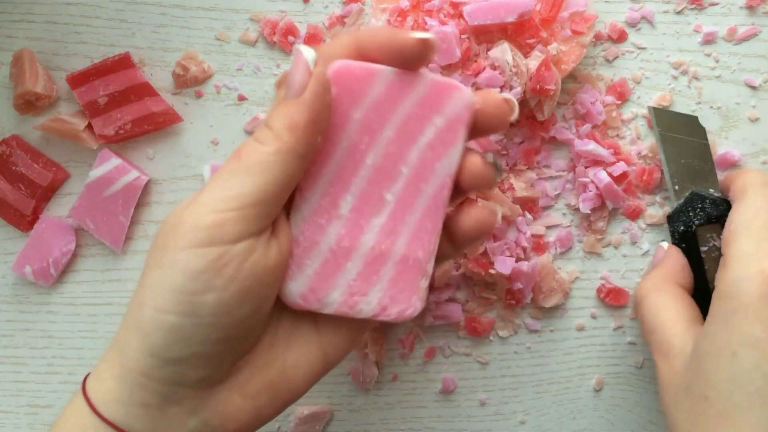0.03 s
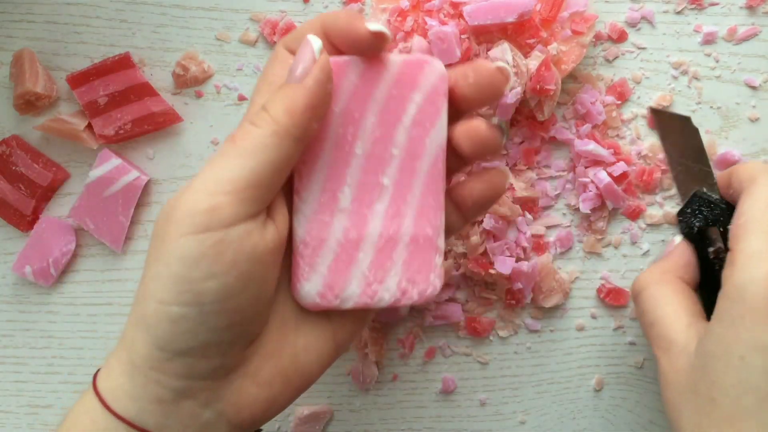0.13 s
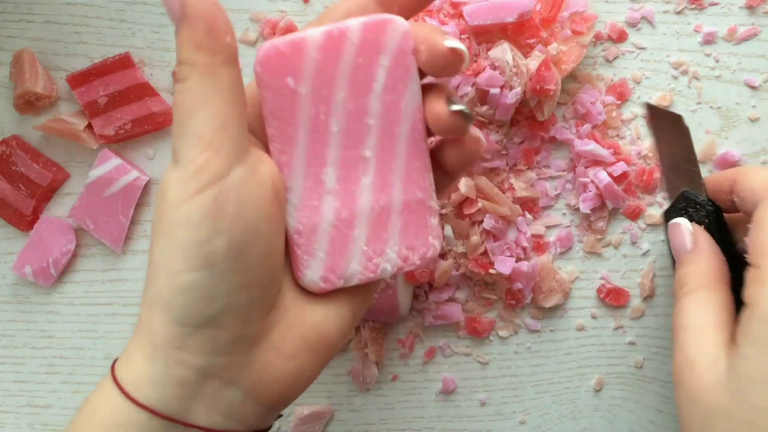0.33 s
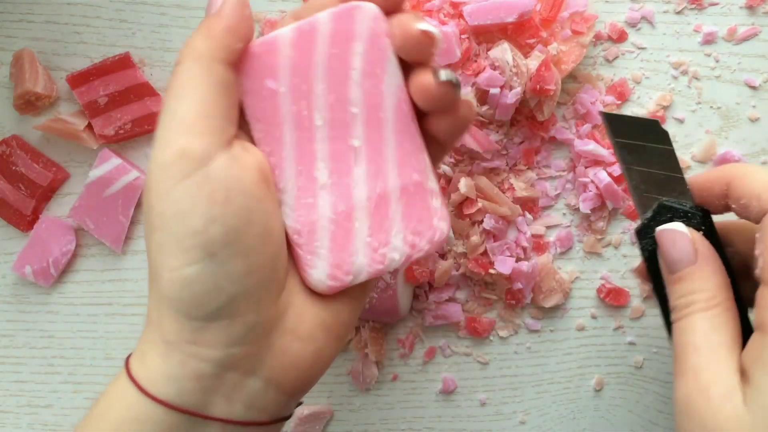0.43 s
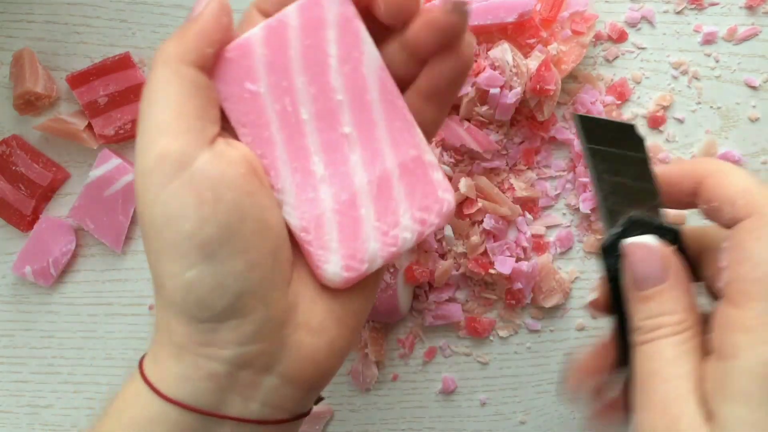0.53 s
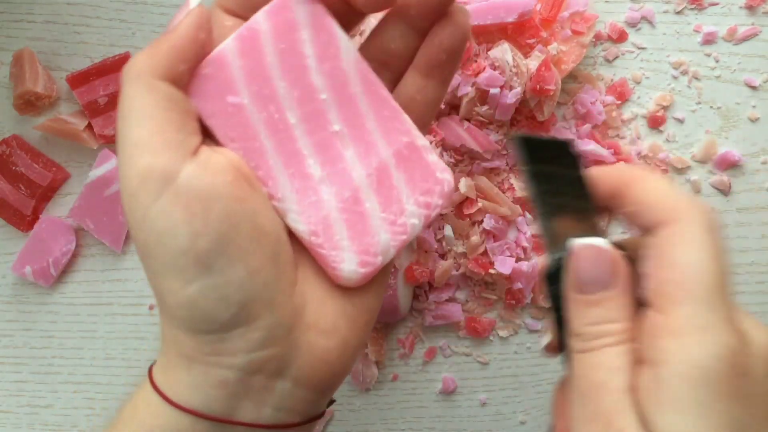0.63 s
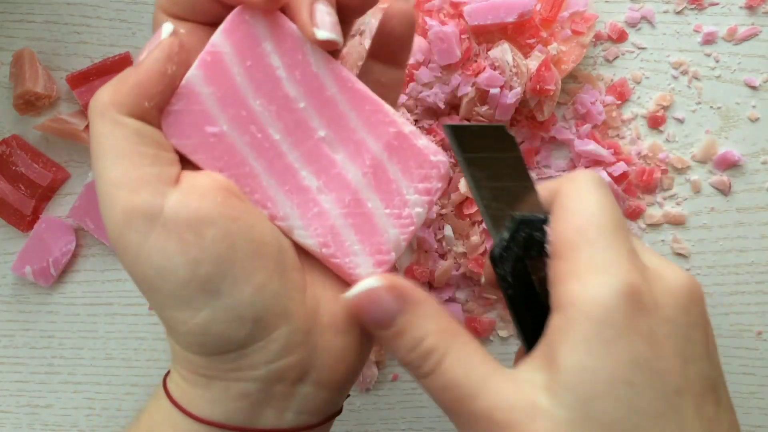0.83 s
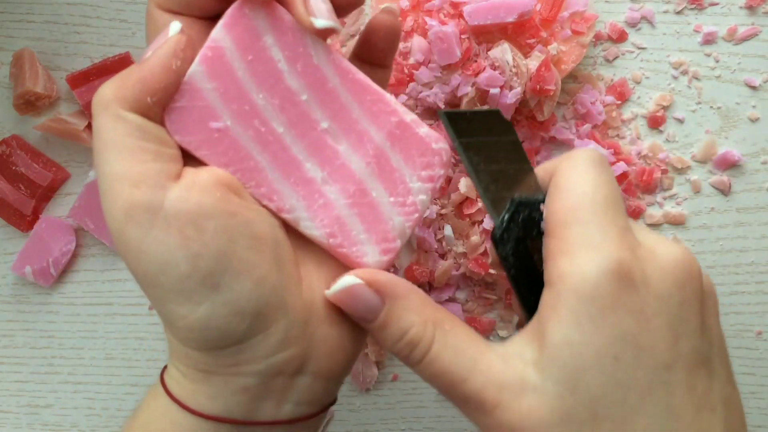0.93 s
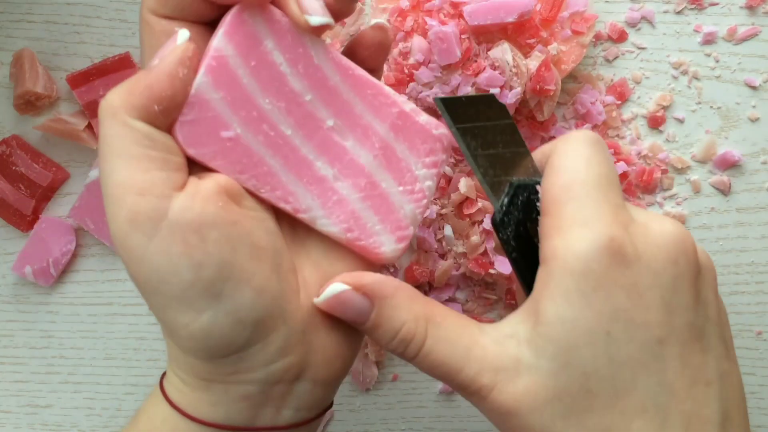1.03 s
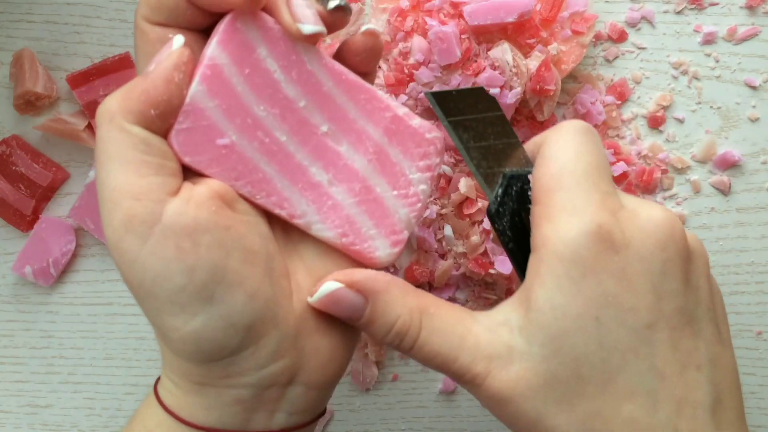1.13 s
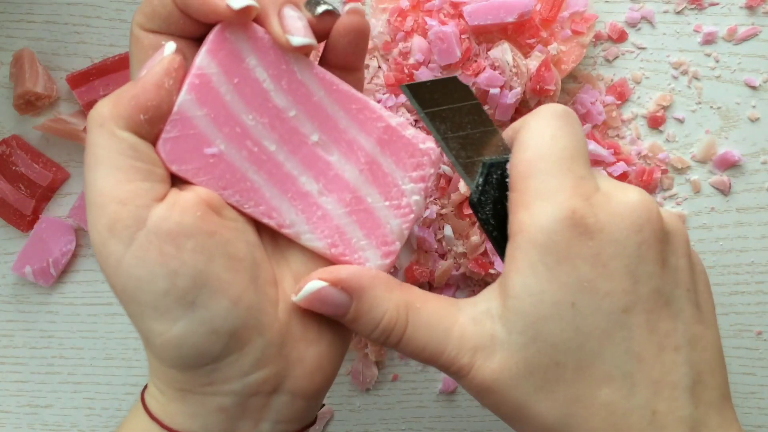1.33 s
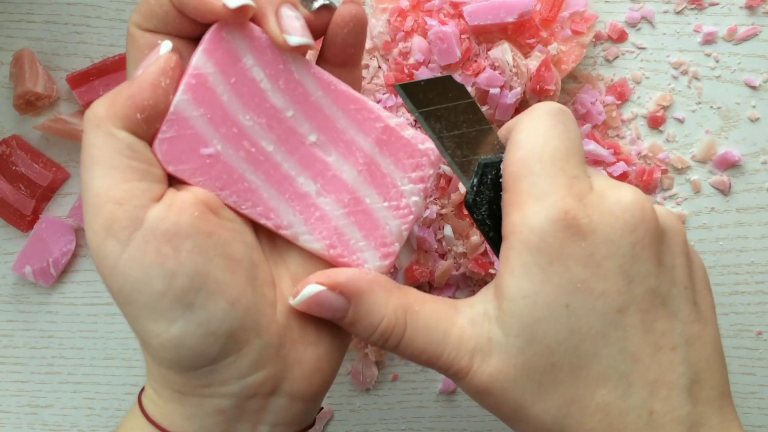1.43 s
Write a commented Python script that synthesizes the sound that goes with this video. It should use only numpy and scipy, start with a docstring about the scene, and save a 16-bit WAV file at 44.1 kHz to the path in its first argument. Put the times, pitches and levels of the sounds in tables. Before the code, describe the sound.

A utility knife knocks once, hard, on a wooden table, crunching soap crumbs, and drags off with a short rasp. Small blade and fingernail ticks and soft hand bumps on a soap bar follow, close by in a quiet room.

```python
"""A snap-off knife is turned over and picked up, close by, from a wooden table strewn with soap crumbs.
Its handle knocks, once hard: the wood thuds, the knife rings and crumbs crunch. It drags off in a rasp
of tiny catches on the grain; then come small ticks of blade and fingernails. Skin rubs on table and
soap, a fingertip squeaks faintly and the hand bumps softly round the bar. The quiet room rumbles."""
import sys
import numpy as np
from scipy import signal
from scipy.fft import rfft, irfft
from scipy.io import wavfile

SR = 44100
rng = np.random.default_rng(int(sys.argv[2]) if len(sys.argv) > 2 else 0)


def put_to_file(sound):
    """Save the sound as 16-bit audio at rate SR, in the file named by the first command-line argument."""
    columns = np.atleast_2d(sound).T  # one column per channel
    safe = np.clip(columns, -1, 1)
    whole_steps = np.round(safe * 32767)
    wavfile.write(sys.argv[1], SR, whole_steps.astype(np.int16))


N = 66150
TIME = np.arange(N) / SR
BIN_HZ = np.maximum(np.arange(N // 2 + 1) * SR / N, 1)

# ring of handle and blade: (frequency [Hz], level [dB], t60 [s])
KNIFE_MODES = [(1465, -9, .07), (2548, -6.5, .05), (3390, -5, .055), (3665, -9, .04), (4260, -7, .04),
               (4790, -8, .03), (5390, -2, .035), (6060, -3, .026), (6840, -13, .03), (7990, -6, .02),
               (8765, -2, .02), (9220, -10, .025), (10180, -3, .022), (11600, -8, .022)]


def handle_knocks():
    """Each knock pushes the table top down, crushes a few crumbs and sets the knife ringing."""
    # handle hits: (time [s], table thud [dB], knife ring [dB], crunch [dB])
    hits = [(0.0741, -50, -61, -63), (0.1342, -50, -71, -70.5), (0.1889, -59.5, -52, -46.5),
            (0.2212, -47.5, -43, -28.5), (0.2250, -25, -26, -23.5), (0.2563, -53, -54, -36.5),
            (0.2706, -43.5, -64, -60), (0.3215, -62, -52, -47), (0.4308, -83, -61.5, -56)]
    # tone of the crushed crumbs: (frequency [Hz], level [dB])
    crunch_tone = [(420, -12), (700, -2), (1200, 2), (2100, -5), (3300, 1), (5400, -4.5), (7000, -10.5),
                   (9000, -11), (11500, -14), (13000, -23), (15500, -33)]
    # brief stereo widening of the noise at the knocks: (frequency [Hz], side minus mid [dB])
    widening = [(300, -6), (2500, -22.5), (5000, -7), (9000, 2.5), (13000, 1.5)]
    crush_attack_s, crush_t60_s = .002, .025
    times, table_db, knife_db, crunch_db = np.transpose(hits)
    crush = sum(from_db(db) * burst(t, crush_attack_s, crush_t60_s) for t, db in zip(times, crunch_db))
    # the knife's modes start one by one as the crumbs give way
    knife = sum(ring(clicks(times + crush_attack_s * rng.random(), knife_db), [m]) for m in KNIFE_MODES)
    knife = rolloff(knife, hz=12500, order=6)
    noise = stereo(colour(crunch_tone), width=widening)
    return knife - table_top(clicks(times, table_db)) + crush * noise


def handle_drag():
    """The handle catches on the wood grain in a dense rasp, heard directly and through table and knife."""
    # envelope of the drag: (time [s], level [dB])
    envelope = [(0, -56), (0.04, -59.5), (0.062, -73.5), (0.11, -56.5), (0.124, -69.5), (0.176, -60.5),
                (0.192, -52.5), (0.22, -36.5), (0.25, -43.5), (0.285, -44), (0.326, -38), (0.355, -47.5),
                (0.385, -48), (0.415, -64.5), (0.44, -59.5), (0.47, -72.5), (0.56, -75)]
    # tone of the direct rasp: (frequency [Hz], level [dB])
    rasp_tone = [(170, -26), (330, -7), (410, -15), (490, -6), (720, -6.5), (1000, -13), (1250, -11.5),
                 (1500, -10.5), (2020, -16.5), (2350, -14), (2560, -10), (2850, -18.5), (3900, -21),
                 (4300, -15), (4700, -22), (6200, -22.5), (7200, -26), (11500, -28), (15000, -42)]
    grains_per_s, spread_db = 5500, 2.5
    rasp_db, wood_db, knife_db = -4, -18.5, -16.5
    caught = rng.random(N) < grains_per_s / SR
    sizes = from_db(spread_db * np.minimum(rng.exponential(1, N), 4))
    grains = caught * sizes * rng.choice([-1, 1], (2, N))
    wood = from_db(wood_db) * rms_one(table_top(grains[0]))
    knife = from_db(knife_db) * rms_one(ring(grains[1], KNIFE_MODES))
    rasp = from_db(rasp_db) * stereo(colour(rasp_tone), grains)
    return level(envelope) * (rasp + wood + knife)


def table_top(force):
    """The wood answers with a hollow thud from its low modes and a lighter clack from the higher ones."""
    # resonances of the table top: (frequency [Hz], level [dB], t60 [s])
    modes = [(198, -8, .1), (220, -6, .09), (243, -7, .14), (277, -9, .1), (323, 0, .2), (342, 0, .17),
             (490, -26, .25), (574, -22, .24), (722, -22, .22), (763, -17, .25), (885, -18, .12),
             (1008, -18, .16), (1140, -18, .16), (1243, -12, .09)]
    split_hz = 400
    push_hz, contact_hz = 350, 2180   # reach of the hand's slow push and the handle's quick contact
    thud = rolloff(ring(force, [m for m in modes if m[0] < split_hz]), push_hz, order=7)
    clack = rolloff(ring(force, [m for m in modes if m[0] >= split_hz]), contact_hz, order=2)
    return rolloff(thud + clack, hz=185, order=3, kind="highpass")


def ticks():
    """Blade and fingernails make short damped contacts, each round its own pitch over a dull skirt."""
    # contacts: (time [s], level [dB], centre [Hz], width [octaves], t60 [s])
    contacts = [(0.0736, -47, 4500, 1.1, .01), (0.131, -59, 9500, .4, 0.026),
                (0.4143, -58.5, 14000, 0.74, 0.034), (0.5751, -58, 2400, 0.55, 0.022),
                (0.7950, -39.5, 5940, .5, 0.0092), (0.7971, -46, 2200, .9, 0.01),
                (0.8703, -56, 9500, .6, .01), (1.317, -70.5, 2580, 0.85, 0.016),
                (1.4925, -65.5, 3660, 0.35, 0.011)]
    skirt_db, skirt_hz = -10.5, 2500
    skirt = from_db(skirt_db) / np.hypot(1, BIN_HZ / skirt_hz)
    out = 0
    for start, db, hz, octaves, t60 in contacts:
        hump = np.exp(-.5 * (np.log2(BIN_HZ / hz) / octaves) ** 2)
        out = out + from_db(db) * burst(start, attack=.0004, t60=t60) * stereo(hump + skirt)
    return out


def low_thuds():
    """Rounded pushes wake low modes: the table thuds under the handle's knock, later the hand bumps."""
    # two rows of low table thud under the knock, then soft hand bumps: (time [s], level [dB])
    thuds = [(0.236, -46.5), (0.306, -50.5), (0.385, -57), (0.480, -68), (0.577, -58.5), (0.6585, -44),
             (0.6726, -41.5), (0.762, -53.5), (0.830, -57), (0.903, -56), (1.192, -66), (1.455, -63.5)]
    # low body of each thud: (frequency [Hz], level [dB], t60 [s])
    modes = [(52, -13, .12), (108, -3.5, .09), (168, 2, 0.062)]
    push = rolloff(clicks(*np.transpose(thuds)), hz=190, order=4)
    return -ring(push, modes)


def hand_rub():
    """Skin rubs on the table in dull swells of friction noise."""
    # envelope of the rub: (time [s], level [dB])
    envelope = [(0, -55), (0.04, -55.5), (0.06, -67.5), (0.085, -56), (0.12, -69), (0.15, -61), (0.2, -54),
                (0.38, -55.5), (0.47, -73.5), (0.58, -84), (0.67, -69), (0.75, -84.5), (1.1, -93),
                (1.145, -73.5), (1.2, -89)]
    # tone of skin on wood: (frequency [Hz], level [dB])
    tone = [(100, -23), (220, -10.5), (310, 3), (390, -5.5), (470, 0.5), (700, -8.5), (1400, -19.5),
            (3000, -38)]
    return level(envelope) * stereo(colour(tone))


def finger_slide():
    """Fingers slide on the soap with a light, bright hiss."""
    # envelope of the slide: (time [s], level [dB])
    envelope = [(0.68, -79), (0.715, -74.5), (0.738, -65), (0.765, -74), (0.81, -67.5), (0.85, -84)]
    # tone of skin on soap: (frequency [Hz], level [dB])
    tone = [(800, -11), (2500, -5.5), (3900, 1.5), (5000, -4), (11000, -6), (15000, -18)]
    return level(envelope) * stereo(colour(tone))


def fingertip_squeak():
    """Skin sticks and slips on the soap: a narrow noise band with a loose pitch."""
    pitch_hz, half_width_hz = 679, 24
    band = 1 / (1 + ((BIN_HZ - pitch_hz) / half_width_hz) ** 2)
    return from_db(-68) * burst(start=.62, attack=.048, t60=.12) * stereo(band)


def room_tail(x):
    """The room's reflections blur into a short diffuse tail."""
    # tone of the reverb: (frequency [Hz], level [dB])
    tone = [(100, -8), (300, 11.5), (1500, 6.5), (6000, -1), (15000, -2)]
    wet_db = -16.5
    tail = stereo(colour(tone)) * burst(start=.004, attack=.004, t60=.21)
    return from_db(wet_db) * signal.fftconvolve(x, rms_one(tail) / np.sqrt(N), axes=1)[:, :N]


def room_tone():
    """A low rumble swells gently under a faint steady hiss."""
    # swell of the rumble: (time [s], level [dB])
    swell = [(0, -70.5), (0.45, -68.5), (0.65, -63.5), (1.5, -63)]
    # tone of the rumble: (frequency [Hz], level [dB])
    rumble_tone = [(20, -29), (45, -14), (72, -12), (101, 0.5), (125, -5.5), (160, -9.5), (220, -25),
                   (400, -28), (900, -41), (2000, -45.5)]
    # tone of the hiss: (frequency [Hz], level [dB])
    hiss_tone = [(400, -3), (600, -1), (1000, -4), (2000, -8), (4000, -11), (6300, -7.5), (10000, -8),
                 (13000, -11.5), (15500, -19)]
    return level(swell) * stereo(colour(rumble_tone)) + from_db(-78) * stereo(colour(hiss_tone))


def from_db(db):
    """Decibels to gain."""
    return 10 ** (np.asarray(db) / 20)


def rms_one(x):
    """Scale to rms 1."""
    return x / np.sqrt(np.mean(x ** 2) + 1e-20)


def level(points):
    """Gain envelope through (time [s], level [dB]) points."""
    return from_db(np.interp(TIME, *np.transpose(points)))


def burst(start, attack, t60):
    """Envelope with a straight rise and an exponential decay; times in seconds."""
    age = TIME - start
    return np.clip(age / attack, 0, 1) * np.exp(-np.log(1000) * np.maximum(age - attack, 0) / t60)


def per_bin(points):
    """Read (frequency [Hz], value) points on a log-frequency axis."""
    hz, value = np.transpose(points)
    return np.interp(np.log(BIN_HZ), np.log(hz), value)


def colour(points):
    """EQ curve as gain per frequency, falling 12 dB an octave beyond its end points."""
    low_cut = np.minimum(BIN_HZ / points[0][0], 1) ** 2
    high_cut = np.minimum(points[-1][0] / BIN_HZ, 1) ** 2
    return from_db(per_bin(points)) * low_cut * high_cut


def rolloff(x, hz, order, kind="lowpass"):
    """A smooth cut of 6 dB an octave per order."""
    return signal.sosfilt(signal.butter(order, hz, kind, fs=SR, output="sos"), x + 1e-18)


def stereo(gain, source=None, width=None):
    """Two signals (white noise unless given) coloured and mixed as mid and side; rms 1."""
    # default spread, nearly mono: (frequency [Hz], side minus mid [dB])
    narrow = [(300, -50), (3500, -45.5), (6000, -24), (12000, -12.5)]
    side_gain = from_db(per_bin(narrow if width is None else width))
    mid, side = rfft(rng.standard_normal((2, N)) if source is None else source)
    left_right = mid + side_gain * side * [[1], [-1]]
    return rms_one(irfft(gain * left_right, N))


def clicks(times, db):
    """One impulse for each contact."""
    out = np.zeros(N)
    samples = (np.asarray(times) * SR).astype(int)
    np.add.at(out, np.clip(samples, 0, N - 1), from_db(db))
    return out


def ring(force, modes):
    """Damped resonators: a unit click sets each mode ringing at its own level."""
    out = 0
    for hz, db, t60 in modes:
        decay, angle = from_db(-60 / (t60 * SR)), 2 * np.pi * hz / SR
        feedback = [1, -2 * decay * np.cos(angle), decay * decay]
        out = out + from_db(db) * signal.lfilter([.5, 0, -.5], feedback, force + 1e-18)
    return out


def scene():
    """The knife with its room tail, low thuds and skin sounds dry, and room tone underneath."""
    knife = handle_knocks() + handle_drag() + ticks()
    reverb = room_tail(knife)
    skin = hand_rub() + finger_slide() + fingertip_squeak()
    return knife + reverb + low_thuds() + skin + room_tone()


def record(dry):
    """A steep high cut takes off the very top."""
    stop_hz, stop_db = 16500, 60
    return signal.sosfilt(signal.cheby2(14, stop_db, stop_hz, fs=SR, output="sos"), dry)


dry = scene()
out = record(dry)
put_to_file(out)
```